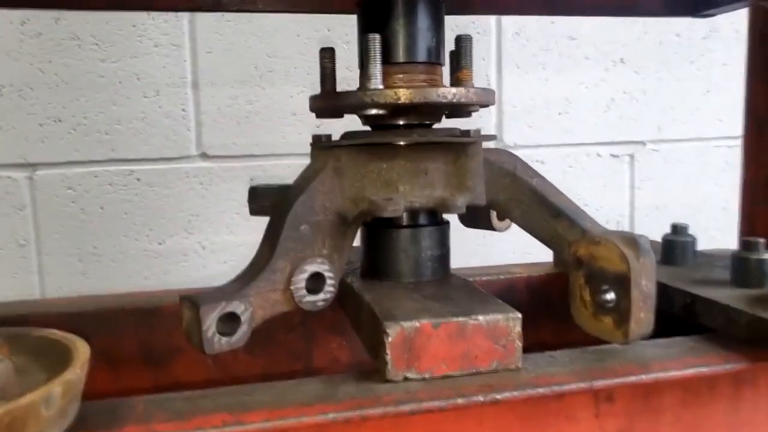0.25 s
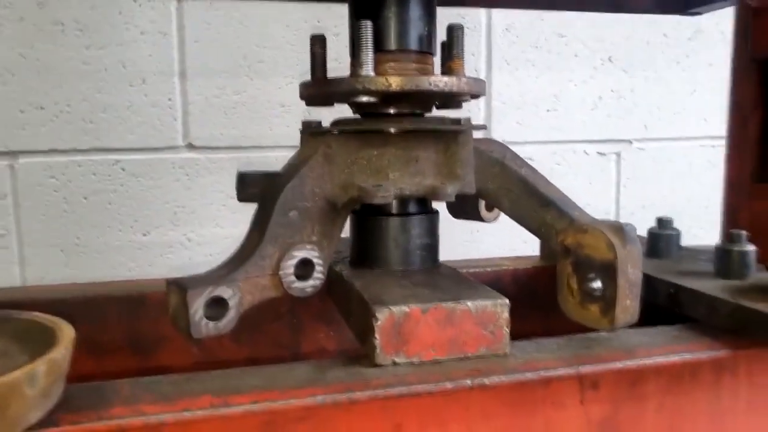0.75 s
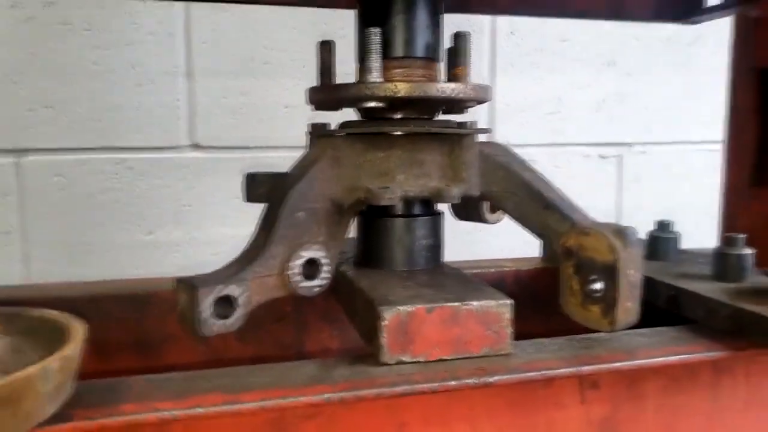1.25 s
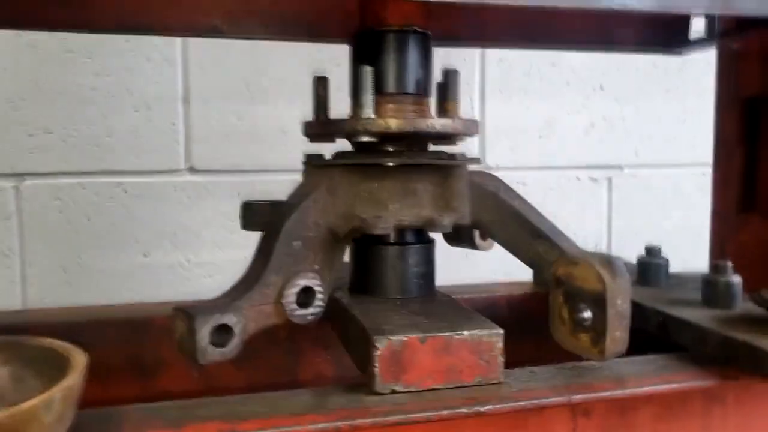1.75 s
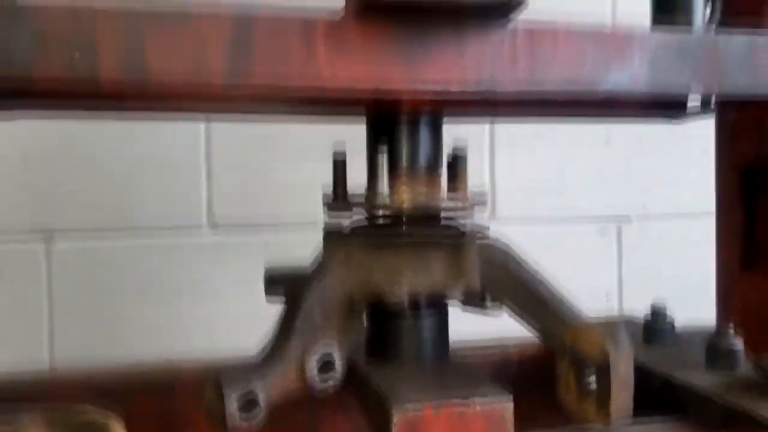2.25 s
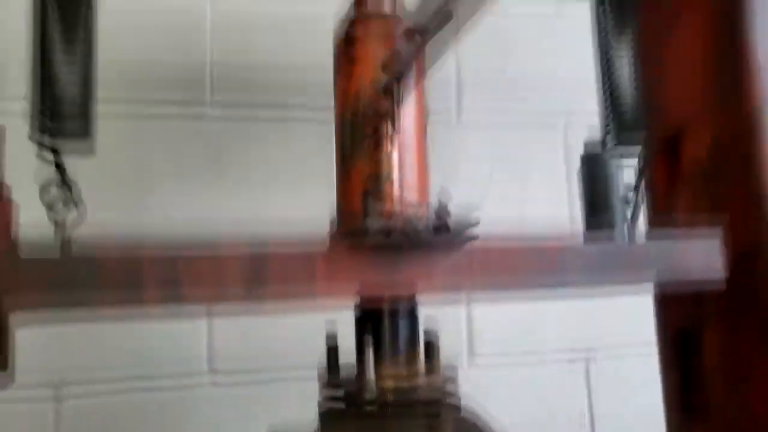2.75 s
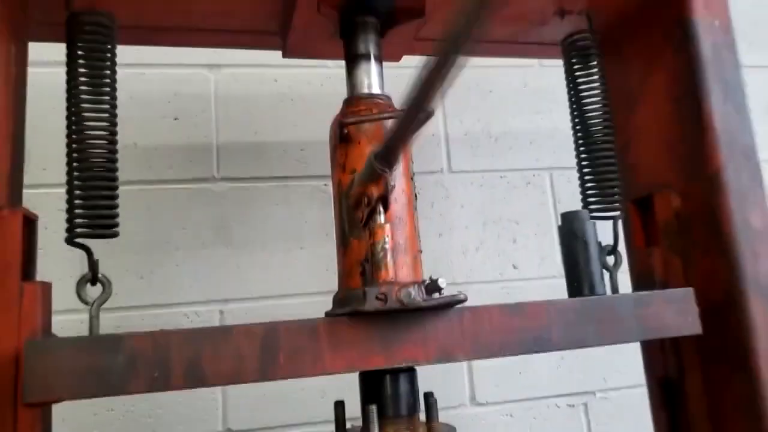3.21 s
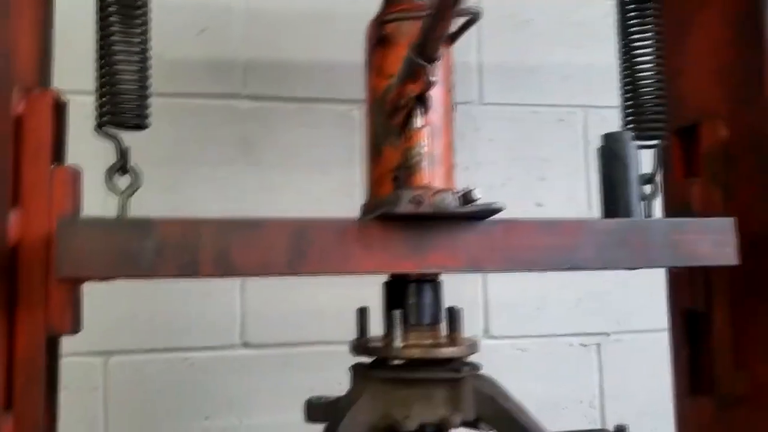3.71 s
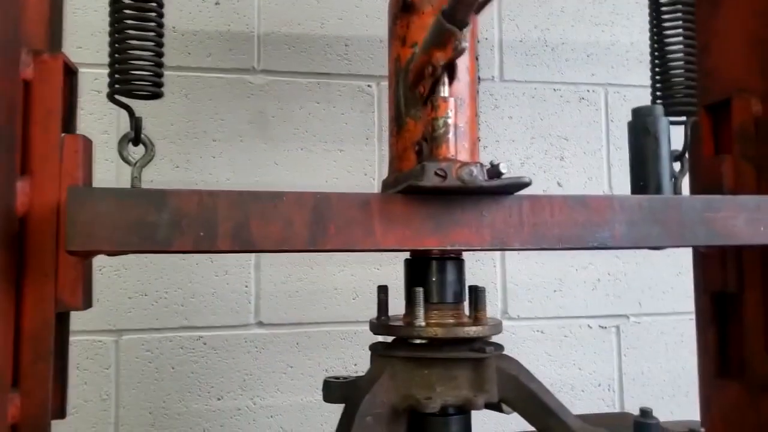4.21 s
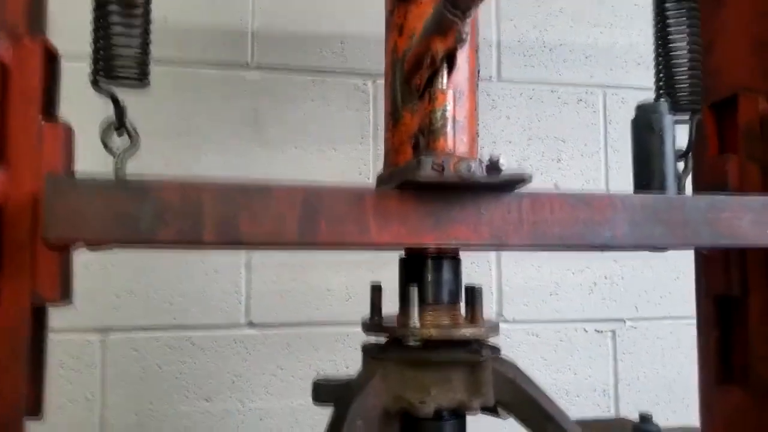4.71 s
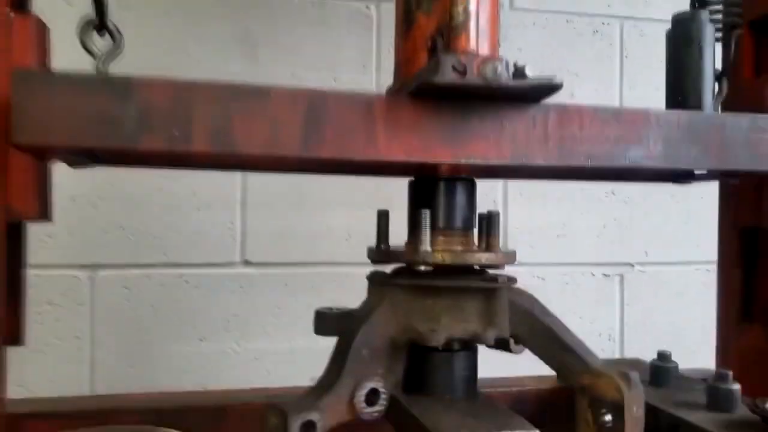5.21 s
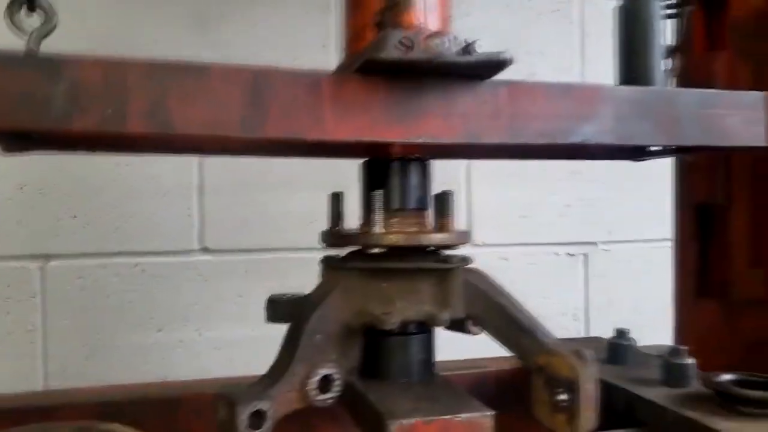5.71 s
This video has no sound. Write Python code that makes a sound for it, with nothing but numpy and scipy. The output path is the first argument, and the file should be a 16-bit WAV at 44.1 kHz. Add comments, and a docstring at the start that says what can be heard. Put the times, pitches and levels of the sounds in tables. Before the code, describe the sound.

Close phone pickup of a steel hydraulic press worked by a hand lever. Strong, crunchy clacks with rapid rattling rebounds come at an even brisk pace, preceded by bright little clinks and scrapes from the loose handle. The hits grow softer and duller as the load tightens, fading to sparse ticks. Hard walls add a light echo; low room hum and rumble continue, with hiss swelling at the end.

```python
"""Steel clacks and bounces, thin clinks and a low humming room: a bottle-jack shop press pumped by hand.
On each stroke, about two a second, the handle clinks in its socket (short noise scrapes and ringing tube modes),
then the hanging beam clacks in the steel frame (low modes, a crunch of tiny impacts and a clang of upper modes).
As the part seats, the load holds the beam and most later clacks are weak. Block walls echo the press over
rumble, hiss and hum; a close phone overloads on the loudest peaks."""
import sys
import numpy as np
from scipy import signal
from scipy.fft import rfft, irfft, next_fast_len
from scipy.io import wavfile
from scipy.ndimage import uniform_filter1d

SR = 44100
rng = np.random.default_rng(int(sys.argv[2]) if len(sys.argv) > 2 else 0)


def file_out(sig):
    """Save sig as 16-bit WAV at sys.argv[1]."""
    # one column per channel
    cols = np.atleast_2d(sig).T
    # limit, then scale
    lim = np.clip(cols, -1, 1)
    pcm = np.round(lim * 32767).astype(np.int16)
    wavfile.write(sys.argv[1], SR, pcm)


N = 262836

# beam clacks against the frame:
# (time [s], thud level [dB], clatter level [dB], bounces [count], time to the first bounce [s])
BEAM_CLACKS = [(0.0, -20.5, -18.5, 0, 0), (0.331, -8, -15.5, 2, .038), (0.768, -9.5, -16, 2, 0.042),
               (1.197, -9.5, -16.5, 3, 0.03), (1.665, -12.5, -17, 3, .035), (2.142, -30.5, -30, 0, 0),
               (2.174, -14, -19, 1, .046), (2.391, -26, -30.5, 0, 0), (2.693, -14, -16, 0, 0),
               (3.227, -13, -18.5, 1, .014), (3.487, -32, -31.5, 0, 0), (3.731, -29, -28, 0, 0),
               (3.756, -21, -25, 0, 0), (4.02, -31, -37, 0, 0), (4.22, -28.5, -28.5, 0, 0),
               (4.499, -34, -39.5, 0, 0), (4.79, -45, -31, 0, 0), (5.211, -42.5, -44, 0, 0),
               (5.41, -44.5, -44, 0, 0), (5.712, -26, -32, 0, 0)]
# handle clinks in its socket:
# (time [s], level [dB], pitch that the contact favours [Hz], scrape decay time [s], after-ring level [dB])
HANDLE_CLINKS = [(0.081, -27.5, 7050, 0.0014, -19), (0.1218, -25, 6100, 0.0037, -20),
                 (0.3018, -25, 6150, 0.0024, -27), (0.462, -35.5, 2700, .002, -11),
                 (0.4979, -26.5, 7500, 0.0021, -12), (0.5534, -24, 3080, 0.0079, -20),
                 (0.7, -30.5, 3220, 0.0013, -26), (0.737, -28.5, 3050, 0.0015, -17),
                 (0.9262, -34.5, 4330, 0.0026, -3), (0.9591, -23, 7940, .002, -15),
                 (1.007, -27, 3200, 0.0023, -6.5), (1.134, -33.5, 2720, 0.0021, -9),
                 (1.1586, -33, 3020, .009, -5), (1.1741, -25.5, 6270, 0.0026, -23.5),
                 (1.339, -33, 3400, .003, -15), (1.376, -23, 7750, .002, -3),
                 (1.446, -26, 2800, 0.0077, -3.5), (1.458, -30, 2720, .002, -15),
                 (1.607, -36, 3220, .012, -3), (1.6338, -22, 2730, 0.0014, -34),
                 (1.87, -21.5, 7000, 0.0092, -3.5), (1.8773, -24, 8300, 0.0026, -11),
                 (2.0907, -39, 4320, 0.0016, -7), (2.125, -37, 3000, 0.012, 3),
                 (2.144, -35.5, 5100, 0.0014, -5), (2.383, -34, 4300, 0.0081, -4),
                 (2.397, -20, 4330, 0.009, -10), (2.408, -20.5, 4830, 0.0018, -11),
                 (2.617, -40.5, 4340, .0014, -9), (2.6628, -20, 5240, 0.0017, -10),
                 (2.934, -32, 4700, 0.00084, 1), (2.965, -26, 5600, 0.0033, 6.5),
                 (3.1196, -34.5, 7000, 0.005, -10.5), (3.126, -27.5, 4280, 0.0013, -17),
                 (3.1963, -24.5, 4400, 0.0026, -21), (3.428, -38, 4770, 0.0012, -13),
                 (3.471, -29.5, 3800, 0.021, -3), (3.699, -35, 3800, 0.022, -6),
                 (3.7279, -19, 4870, 0.0012, -19), (3.952, -28.5, 3820, 0.0013, 3),
                 (3.986, -23.5, 2640, .003, -11), (4.131, -44, 4300, .003, -10.5),
                 (4.178, -36, 2750, .001, -20), (4.194, -34.5, 4300, .015, -3),
                 (4.215, -28.5, 3160, 0.005, -9), (4.498, -38.5, 4300, 0.0024, -18),
                 (4.523, -37, 5430, 0.0018, -10), (4.5634, -34, 2700, 0.00066, -16),
                 (4.628, -44.5, 2700, .002, -11), (4.744, -41.5, 4300, .0014, -14),
                 (4.788, -25.5, 8800, .002, -10), (5.714, -32, 3940, 0.0075, -13),
                 (5.7644, -29, 4220, .001, -21.5)]
FIRM_DB = -30.5  # clacks whose clatter is above this follow a slide; clinks above it jolt the beam


def undb(db):
    """Decibels to gain."""
    return 10 ** (np.asarray(db) / 20)


def unit(x, span_s=None):
    """Scale to rms 1, over the first span_s seconds if given."""
    head = x if span_s is None else x[:int(span_s * SR)]
    return x / np.sqrt(np.mean(head ** 2))


def fade(t, t60):
    """Exponential decay by 60 dB in t60 seconds."""
    return np.exp(-np.log(1000) * t / t60)


def colour(x, points):
    """Causal minimum-phase filter whose gain follows (frequency [Hz], level [dB]) points."""
    size = next_fast_len(len(x) + 2048, True) * 2
    hz, db = np.transpose(points)
    freqs = np.maximum(np.arange(size // 2 + 1) * SR / size, 1)
    gain = undb(np.interp(np.log(freqs), np.log(hz), db))
    # folding the cepstrum onto positive times makes the filter causal
    cepstrum = irfft(np.log(gain))
    cepstrum[1:size // 2] *= 2
    cepstrum[size // 2 + 1:] = 0
    response = np.exp(rfft(cepstrum))
    return irfft(rfft(x, size) * response)[:len(x)]


def ring(modes, t, scatter_db, detune, freedom=1):
    """Decaying modes; every blow lands a little differently, so their weights and pitches vary."""
    out = 0
    for k, (hz, db, t60) in enumerate(modes):
        weight, shift = rng.standard_normal(2)
        swing = np.sin(2 * np.pi * hz * (1 + detune * shift) * t)
        level = (-1) ** k * undb(db + scatter_db * weight)
        out = out + level * fade(t, t60 * freedom) * swing
    return out


def add(track, start_s, sound):
    """Mix a sound into the track."""
    i = max(int(start_s * SR), 0)
    track[i:i + len(sound)] += sound[:N - i]


def beam():
    """Each blow booms in the beam's low modes while tiny impacts rattle the frame's dense upper ones."""
    # low modes of the beam: (frequency [Hz], relative level [dB], t60 when free [s])
    beam_modes = [(187, -25, 0.15), (214, -21, 0.34), (285.3, -13.5, 0.15), (334.3, -16.5, 0.67),
                  (382, -22, 0.17), (441.4, -1.5, 0.21), (463, -3.5, 0.38), (531.7, -10.5, 0.4),
                  (569, -20, 0.71), (617, 1.5, 0.16), (649, -10, 0.1), (699, -4, 0.083)]
    # clear upper modes of the frame: (frequency [Hz], relative level [dB], t60 when free [s])
    frame_modes = [(803, -3, 0.2), (1118, -3.5, 0.23), (1208, -9, 0.26), (1480, -1.5, 0.37),
                   (1745, -0.5, 0.39), (2084, -12, 0.45), (2458, -0.5, 0.32), (2840, 1, 0.24),
                   (4820, 12.5, 0.19), (5300, 13, 0.15), (5600, 10, 0.12), (6248, 10, 0.25),
                   (7030, 8, 0.19), (7200, 8, 0.14)]
    # colour of the frame's dense upper modes: (frequency [Hz], relative level [dB])
    crunch_colour = [(120, -34.5), (300, 3), (700, 0.5), (1250, 0), (1900, -6), (2700, -2), (3300, -5),
                     (4600, 1.5), (5600, -1), (7000, -5.5), (8000, -15), (9100, -18), (10500, -35),
                     (15500, -51)]
    # how freely the beam rings under load: (time [s], share of the free ring time [ratio])
    freedom_curve = [(0, 0.85), (1.7, 0.91), (2.7, 0.69), (3.3, 0.64), (4.3, 0.72), (5.9, 0.95)]
    # harder blows are brighter: treble against clatter for a full blow, and its change per dB of clatter
    full_blow_db, full_treble_db, treble_per_db = -15.5, -5.5, .5

    out, t = np.zeros(N), np.arange(int(.6 * SR)) / SR
    for s, thud_db, clatter_db in blows():
        treble_db = clatter_db + full_treble_db + treble_per_db * (clatter_db - full_blow_db)
        freedom = max(np.interp(s, *np.transpose(freedom_curve)), .1)

        # the boom swells over a cycle or two; renewed contact with the frame soon takes part of it away
        swell = (1 - np.exp(-t / 0.0016)) * (np.exp(-t / (0.1 * freedom)) + undb(-5.5))
        thud = ring(beam_modes, t, scatter_db=2.0, detune=0.0021, freedom=freedom) * swell

        # countless crowded modes answer the tiny impacts as a crunch
        chatter = rng.laplace(size=len(t)) * (1 - np.exp(-t / 0.003)) ** 2 * fade(t, t60=0.062)
        dense_decay = fade(t, t60=0.25 * freedom) + undb(-14) * fade(t, t60=0.4)
        dense_modes = rng.standard_normal(len(t)) * dense_decay
        crunch = signal.fftconvolve(chatter, dense_modes)[:len(t)]
        crunch = unit(colour(crunch, crunch_colour), span_s=0.04)

        # a few clear modes ring on
        clang = ring(frame_modes, t, scatter_db=4.5, detune=0.0015, freedom=freedom)
        clang = unit(clang * (1 - np.exp(-t / 0.0027)), span_s=0.072)

        clatter = crunch * undb(5.5) + clang * undb(-5.0)
        clatter = colour(clatter, [(2000, clatter_db), (4000, treble_db)])
        add(out, s, unit(thud, span_s=0.042) * undb(thud_db) + clatter)
    return out


def blows():
    """Blows on the beam (time [s], thud [dB], clatter [dB]): clacks, ever weaker bounces, handle jolts."""
    bounce_shrink = 0.92  # each gap as a share of the one before
    thud_loss_db, clatter_loss_db = 3.0, 2.5  # per bounce
    # a firm clink jolts the beam a moment later; levels against the clink
    jolt_lag_s, jolt_thud_db, jolt_clatter_db = 0.002006, -4, -7.5
    jolt_fade_db_per_s = 1.36  # the growing load holds the beam against jolts

    out = []
    for s, thud_db, clatter_db, bounces, gap_s in BEAM_CLACKS:
        for k in range(round(bounces) + 1):
            out.append((s, thud_db - k * thud_loss_db, clatter_db - k * clatter_loss_db))
            s = s + gap_s * bounce_shrink ** k
    for s, db, *_ in HANDLE_CLINKS:
        if db > FIRM_DB:
            jolt_db = db - jolt_fade_db_per_s * s
            out.append((s + jolt_lag_s, jolt_db + jolt_thud_db, jolt_db + jolt_clatter_db))
    return out


def handle():
    """Steel scrapes on steel for milliseconds and the tube rings; the point of contact sets the colour."""
    # modes of the handle tube: (frequency [Hz], relative level [dB], t60 before socket damping [s])
    tube_modes = [(2643, -6.5, 0.077), (2900, -9, 0.093), (3866, -21.5, 0.086), (4264, -2.5, 0.071),
                  (4232, 2, 0.023), (4840, -21, 0.049), (5400, -2.5, 0.046), (6004, -2, 0.082),
                  (6117, 7.5, 0.033), (6093, -2, 0.073), (7300, -4, 0.04), (8070, -3.5, 0.073),
                  (8660, -13, 0.1)]
    # colour of a bare steel contact: (frequency [Hz], relative level [dB])
    contact_colour = [(200, -8), (1300, -5), (2200, -9), (3300, -6.5), (4400, -2.5), (6200, -2),
                      (8200, -10), (9300, -15), (11000, -29.5), (15500, -48)]

    out, t = np.zeros(N), np.arange(int(.2 * SR)) / SR
    for s, level_db, pitch_hz, scrape_s, ring_db in contacts():
        grip = (1 - np.exp(-t / 0.00094)) ** 2 * np.exp(-t / max(scrape_s, 1e-4))
        # cubed noise is spiky: tiny rebounds after the first contact
        rebounds = undb(-31) * rng.standard_normal(len(t)) ** 3 * fade(t, t60=0.1)
        scrape = colour(rng.standard_normal(len(t)) * grip + rebounds, contact_colour)

        # the socket soon damps the tube; it rings on only where it springs free
        damping = (1 - np.exp(-t / .0012)) * (np.exp(-t / .0028) + undb(ring_db))
        tube = ring(tube_modes, t, scatter_db=3.0, detune=0.006) * damping

        clink = unit(scrape, span_s=0.029) * undb(-.5) + unit(tube, span_s=0.011) * undb(4.5)
        add(out, s, colour(clink, socket(s, pitch_hz)) * undb(level_db))
    return out


def contacts():
    """Every touch of the handle: clinks, a faint rebound after each, and the slide before a firm clack."""
    rebound_min_s, rebound_max_s, rebound_db = .009, 0.017, -15  # level against the clink
    # the handle slides across its play in the socket ahead of the clack
    slide_lead_s, slide_s, slide_db, slide_hz, slide_ring_db = .041, 0.03, -35.5, 3460, -10

    delays = rng.uniform(rebound_min_s, rebound_max_s, len(HANDLE_CLINKS))
    rebounds = [(s + delay, db + rebound_db, *rest)
                for (s, db, *rest), delay in zip(HANDLE_CLINKS, delays)]
    slides = [(s - slide_lead_s, slide_db, slide_hz, slide_s, slide_ring_db)
              for s, thud_db, clatter_db, *_ in BEAM_CLACKS
              if clatter_db > FIRM_DB and s > slide_lead_s]
    return HANDLE_CLINKS + rebounds + slides


def socket(s, pitch_hz):
    """Colour of a clink: duller as the load grows, lifted round the pitch that the contact favours."""
    # clink colour at the start: (frequency [Hz], level [dB], drift as the load grows [dB/s])
    socket_colour = [(2700, -3.5, 0), (4300, -.5, 0), (5960, -0.5, -1.0), (7900, -3, -0.96),
                     (11000, -1.5, -0.5)]
    favour_db, favour_octaves = 7.5, 0.2  # lift and width round the favoured pitch

    hz, db, drift = np.transpose(socket_colour)
    grid = np.geomspace(1000, 16000, 49)
    lift = favour_db * np.exp(-(np.log2(grid / pitch_hz) / favour_octaves) ** 2)
    base_db = np.interp(np.log(grid), np.log(hz), db + drift * s)
    return np.transpose([grid, base_db + lift])


def room(x, t60_bright, t60_dull, wet_db):
    """Diffuse echo from the block walls: decaying noise whose bass dies first, leaving a brighter tail."""
    t = np.arange(int(.8 * SR)) / SR
    bright = colour(rng.standard_normal(len(t)), [(1500, 14.3), (6000, 13.3)]) * fade(t, t60_bright)
    dull = colour(rng.standard_normal(len(t)), [(1500, 15.5), (5000, -11)]) * fade(t, t60_dull)
    echo = (bright + dull) * (1 - np.exp(-t / 0.00066))
    echo = echo / np.sqrt(np.sum(echo ** 2))  # unit energy
    return signal.fftconvolve(x, echo)[:N] * undb(wet_db)


def shop():
    """Filtered noise makes a low rumble and a smooth hiss, louder at the end; sines make a wavering hum."""
    # background levels: (time [s], rumble level [dB], hiss level [dB])
    level_curve = [(0, -41.5, -47), (2.5, -42.3, -46), (3.6, -40, -44.7), (4.5, -40.3, -44.7),
                   (5.15, -40.5, -43.8), (5.4, -39, -42), (5.96, -36.5, -40)]
    # rumble colour: (frequency [Hz], relative level [dB])
    rumble_colour = [(18, -24), (28, -17), (38, 6.5), (55, -4), (80, -2.5), (200, -2.5), (260, -8),
                     (480, -7), (700, -14), (1200, -16.5), (2000, -26), (4000, -27.5), (12000, -54)]
    # hiss colour: (frequency [Hz], relative level [dB])
    hiss_colour = [(500, -18), (2000, -12), (3700, -7), (6300, 0), (8200, -1), (9000, -10.5), (10000, -26),
                   (12000, -39), (15500, -46)]
    # mains and fan hum: (frequency [Hz], mean peak level [dB])
    hum_tones = [(55, -43), (186, -52.5), (213, -47.5), (322, -45.5)]

    t = np.arange(N) / SR
    s, *levels = np.transpose(level_curve)
    rumble_db, hiss_db = (np.interp(t, s, level) for level in levels)
    rumble = unit(colour(rng.standard_normal(N), rumble_colour))
    hiss = unit(colour(rng.standard_normal(N), hiss_colour))
    hum = 0
    for hz, db in hum_tones:
        # twice-smoothed noise sways the level and, shifted in time, the phase
        smooth = uniform_filter1d(rng.standard_normal(N), SR // 10)
        waver = unit(uniform_filter1d(smooth, SR // 10))
        phase = 2 * np.pi * hz * t + 0.71 * np.roll(waver, N // 2)
        hum = hum + undb(db) * (1 + 0.29 * waver) * np.sin(phase)
    return rumble * undb(rumble_db) + hiss * undb(hiss_db) + hum


def scene():
    """The press, its echo and the shop behind it."""
    press = beam() + handle()
    echo = room(press, t60_bright=1.0, t60_dull=0.73, wet_db=-15)
    return (press + echo + shop())[None]


def record(dry):
    """The phone flattens peaks near full scale, then a steep low-pass cuts the top."""
    top_hz = 15900
    held = dry / (1 + dry ** 14) ** (1 / 14)
    low_pass = signal.ellip(8, .2, 70, top_hz, fs=SR, output="sos")  # ripple .2 dB, stop band 70 dB down
    return signal.sosfilt(low_pass, held)


dry = scene()
out = record(dry)
file_out(out)
```